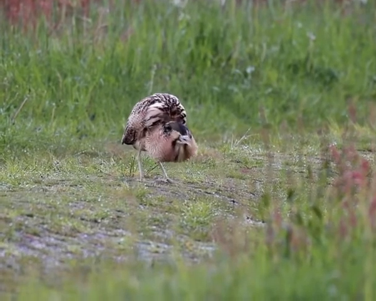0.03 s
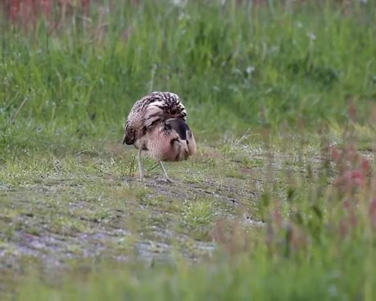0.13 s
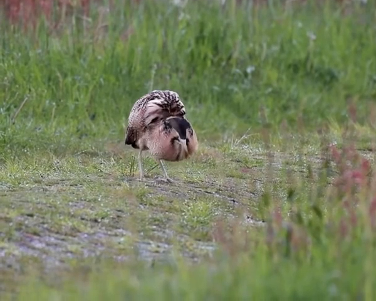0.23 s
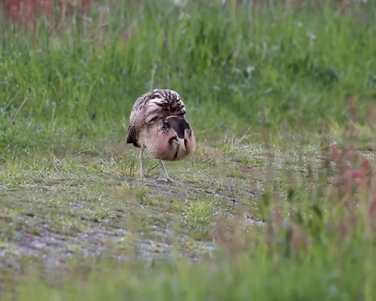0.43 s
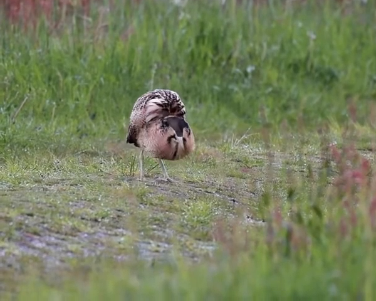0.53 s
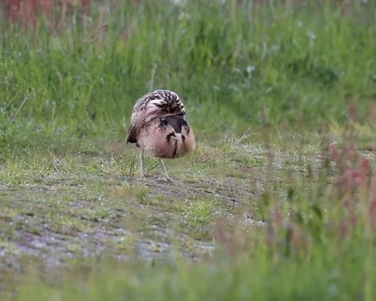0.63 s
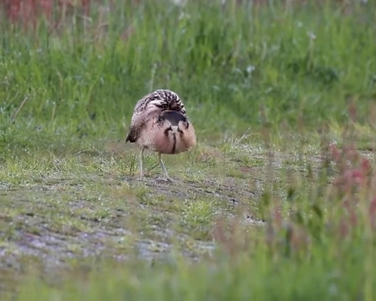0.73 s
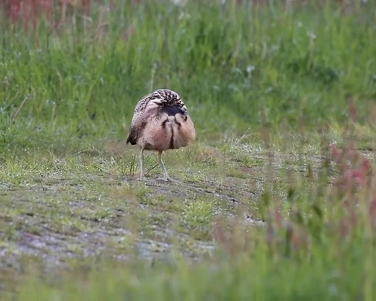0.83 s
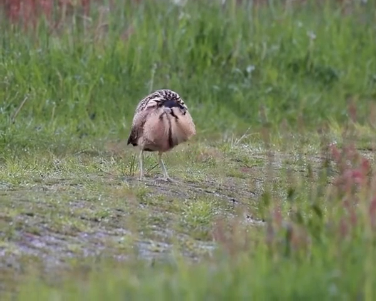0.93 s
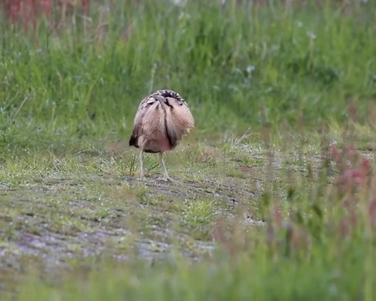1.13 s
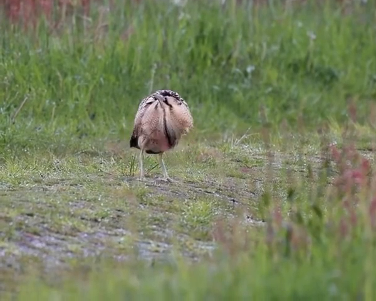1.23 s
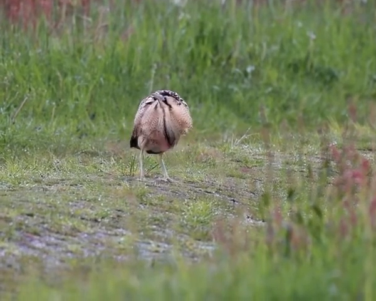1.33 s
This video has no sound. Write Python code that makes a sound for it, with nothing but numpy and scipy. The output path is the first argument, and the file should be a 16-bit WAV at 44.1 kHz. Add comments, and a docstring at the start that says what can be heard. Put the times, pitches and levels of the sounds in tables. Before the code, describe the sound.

A large bird booms once in open grassland. A soft low note at 0-0.1 s leads to a deep, almost pure tone near 150 Hz from 0.2 s, swelling in quick throbs, holding until 0.6 s and fading by 0.8 s. Faint chirps run throughout, a small nasal call comes near 0.3 s, and thin gliding whistles from 0.6 to 1.3 s. Birds sit far right over soft rumble, hiss and tiny early grass ticks.

```python
"""Booming bird in open grassland

A large bird booms once: a soft low note, then a nearly pure tone from its inflated throat that swells
in three throbs, holds and dies away. Small birds whistle and chirp in gliding sines; nasal calls are
three harmonics through throat resonances. Decaying noise bursts tick in the grass; shaped noise gives
a faint rumble of air and a steady hiss. The birds are much louder on the right."""
import sys
import numpy as np
from scipy import signal
from scipy.fft import rfft, irfft
from scipy.io import wavfile
from scipy.ndimage import uniform_filter1d

SR = 44100
rng = np.random.default_rng(int(sys.argv[2]) if len(sys.argv) > 2 else 0)


def unload_audio(sound):
    """Save the sound as a 16-bit wav file, at the path given as the first command line argument."""
    columns = np.transpose(np.atleast_2d(sound))
    # keep every value between -1 and 1, then stretch to whole-number steps
    steps = np.round(np.clip(columns, -1, 1) * 32767)
    wavfile.write(sys.argv[1], SR, steps.astype(np.int16))


N = 61739  # samples


def undb(db):
    """Decibels to gain."""
    return 10 ** (np.asarray(db) / 20)


def walk(rate_hz):
    """Smooth random motion with a spread of 1: white noise averaged twice."""
    size = max(2, int(SR / rate_hz))
    noise = rng.standard_normal(N)
    smooth = uniform_filter1d(uniform_filter1d(noise, size), size)
    return smooth / smooth.std()


def pan(x, right_over_left_db):
    """The right channel at full level, the left weaker."""
    return x * np.array([[undb(-right_over_left_db)], [1]])


def tone(hz):
    """A sine of rms 1 that follows a pitch: phase is the running sum of frequency."""
    return np.sqrt(2) * np.sin(2 * np.pi * np.cumsum(hz) / SR)


def follow(curve, size):
    """Pitch and gain along a curve, silent outside it, corners rounded over size samples."""
    t = np.arange(N) / SR
    time_s, pitch_hz, level_db = np.array(curve).T
    hz = np.interp(t, time_s, pitch_hz)
    inside = (t >= time_s[0]) * (t <= time_s[-1])
    gain = undb(np.interp(t, time_s, level_db)) * inside
    return uniform_filter1d(hz, size), uniform_filter1d(gain, size)


def note(start_s, length_s):
    """Progress 0-1 through a short note, and its arched envelope."""
    progress = np.clip((np.arange(N) / SR - start_s) / length_s, 0, 1)
    return progress, np.sin(np.pi * progress)


def field(x, wet_db):
    """Diffuse scatter from grass and banks: exponentially decaying noise tails of unit energy."""
    t60_s, pan_db = 0.22, 18
    t = np.arange(N // 2) / SR
    tail = rng.standard_normal((2, len(t))) * np.exp(-np.log(1000) * t / t60_s)
    tail /= np.sqrt(np.sum(tail ** 2, axis=1, keepdims=True))
    wet = signal.fftconvolve(x[None], tail, axes=1)[:, :N]
    return pan(undb(wet_db) * wet, pan_db)


def booming_bird():
    """The inflated throat rings as one nearly pure tone: a soft note, then the boom."""
    # boom: (time [s], pitch [Hz], level [dB])
    boom_curve = [(.192, 140.2, -43.5), (.201, 136.6, -20.5), (.212, 130.3, -17.5), (.231, 118.1, -21),
                  (.249, 146.6, -9), (.261, 134.5, -16.5), (.273, 149.5, -7.5), (.286, 160.8, -6.5),
                  (.298, 158.4, -9), (.345, 152.5, -5), (.38, 152, -5), (.445, 152.2, -6.5),
                  (.48, 150.3, -5.5), (.56, 151.8, -6.5), (.622, 148.8, -8), (.668, 154, -17.5),
                  (.70, 149, -25.5), (.76, 153.6, -38.5), (.84, 150, -66)]
    # soft note before it: (time [s], pitch [Hz], level [dB])
    lead_curve = [(0, 195, -28), (.05, 195.5, -29.5), (.066, 183, -34.5), (.078, 179, -31.5),
                  (.098, 179, -33.5), (.115, 174.6, -57)]
    octave_db, flutter_db = -62, 0.41  # octave re fundamental
    boom_pan_db, lead_pan_db, field_db = 17.5, 16, -42

    hz, gain = follow(boom_curve, size=220)
    partials = tone(hz) + undb(octave_db) * tone(2 * hz)
    boom = gain * undb(flutter_db * walk(75)) * partials
    hz, gain = follow(lead_curve, size=220)
    lead = gain * tone(hz)
    return pan(boom, boom_pan_db) + pan(lead, lead_pan_db) + field(boom + lead, field_db)


def whistles():
    """Thin gliding sines, slightly unsteady in pitch and level."""
    # one curve per whistle: (time [s], pitch [Hz], level [dB])
    whistle_curves = [
        [(.605, 6250, -73.5), (.618, 6050, -45), (.632, 5750, -38), (.662, 5820, -44), (.671, 5530, -34),
         (.68, 5280, -51), (.691, 5520, -31.5), (.70, 6250, -51.5), (.71, 6870, -44)],
        [(.792, 6350, -50), (.805, 6460, -32.5), (.818, 6200, -43), (.826, 5910, -32.5), (.843, 5795, -38),
         (.851, 6170, -36.5), (.859, 6870, -48), (.882, 6800, -55)],
        [(.962, 6150, -69), (.971, 5970, -30), (.982, 5955, -39), (.992, 5470, -24.5), (1.002, 5310, -40.5),
         (1.02, 5050, -37.5), (1.045, 5000, -43.5), (1.056, 4900, -53)],
        [(1.12, 4710, -56), (1.136, 4740, -38.5), (1.148, 4790, -29.5), (1.178, 5130, -27), (1.2, 5280, -30.5),
         (1.234, 5447, -28), (1.252, 5520, -40.5), (1.271, 5530, -57), (1.278, 5500, -65)],
    ]
    flutter_db, jitter_ratio = 1.2, 0.0012
    out = np.zeros(N)
    for curve in whistle_curves:
        hz, gain = follow(curve, size=130)
        level = gain * undb(flutter_db * walk(250))
        out += level * tone(hz * (1 + jitter_ratio * walk(560)))
    return out


def chirp(start_s, length_s, start_hz, middle_hz, end_hz, db):
    """One quick sine note whose pitch bends through three points."""
    progress, swell = note(start_s, length_s)
    bow_hz = middle_hz - (start_hz + end_hz) / 2
    hz = start_hz + (end_hz - start_hz) * progress + bow_hz * swell
    return undb(db) * swell * tone(hz)


def twitter():
    """Distant birds: faint, straight-gliding chirps at random times and pitches."""
    draws_per_s, length_s, level_db = 45, 0.016, -60.5
    base_hz, spread_hz, sweep_hz = 5340, 1300, 350
    duration_s = N / SR
    out = np.zeros(N)
    # draws run -1.3 to 1; notes that end before time 0 are silent
    for when, height, sweep, size in rng.uniform(-1.3, 1, (int(draws_per_s * duration_s), 4)):
        start_s = (when + 1) / 2 * duration_s
        hz, glide_hz = base_hz + spread_hz * height, sweep_hz * sweep
        out += chirp(start_s, length_s, hz - glide_hz, hz, hz + glide_hz, level_db + 3 * size)
    return out


def chirps():
    """Short chirps of nearer birds over the twitter, under a common level flutter."""
    # (start [s], length [s], start pitch [Hz], middle pitch [Hz], end pitch [Hz], level [dB])
    chirp_notes = [(.015, 0.085, 4470, 4570, 4560, -52.5), (0.064, 0.12, 5680, 5650, 5540, -54.5),
                   (0.145, 0.039, 6000, 5875, 5910, -38.5), (0.199, 0.012, 7040, 6790, 6000, -50),
                   (0.245, 0.027, 4900, 5150, 5200, -51.5), (.308, .028, 7050, 6650, 5900, -50),
                   (.353, 0.02, 3726, 4374, 5010, -53), (.429, 0.034, 7180, 6570, 5970, -47),
                   (0.538, .02, 4246, 4715, 4920, -50.5), (0.555, .022, 7000, 6420, 5580, -46.5),
                   (.654, .011, 6110, 6386, 6870, -50.5), (0.717, 0.042, 4910, 5020, 4940, -47.5),
                   (.837, 0.021, 3730, 4320, 4800, -54), (1.018, 0.011, 4180, 4680, 4900, -45),
                   (1.186, 0.034, 4180, 3690, 3360, -51.5), (1.321, 0.02, 5050, 5130, 5000, -52.5),
                   (1.333, 0.034, 4050, 3384, 4120, -41.5)]
    flutter_db = 3.5
    near = sum(chirp(*row) for row in chirp_notes)
    return (near + twitter()) * undb(flutter_db * walk(300))


def nasal_calls():
    """Rough arched calls whose three harmonics pass through fixed throat resonances."""
    # (start [s], length [s], top pitch [Hz], level [dB])
    calls = [(0.271, .049, 1021, -35), (0.817, 0.0426, 1034, -49)]
    # throat resonance of each harmonic: (centre [Hz], width [Hz], relative level [dB])
    throat = [(1020, 270, -23.5), (1930, 640, -0.5), (3254, 170, -5)]
    arch_ratio, top_progress = 0.34, 0.36  # pitch drop, place of the pitch peak
    jitter_ratio, flutter_db = 0.014, 3
    out = np.zeros(N)
    for start_s, length_s, pitch_hz, db in calls:
        progress, swell = note(start_s, length_s)
        arch = 1 - arch_ratio * (progress - top_progress) ** 2
        hz = pitch_hz * (arch + jitter_ratio * walk(500))
        for k, (centre_hz, width_hz, part_db) in enumerate(throat, 1):
            resonance = 1 / np.hypot(1, 2 * (k * hz - centre_hz) / width_hz)
            level = undb(db + part_db + flutter_db * walk(230))
            out += level * swell * resonance * tone(k * hz)
    return out


def small_birds():
    """Whistles, chirps and nasal calls on the right, with their scatter."""
    whistle_pan_db, chirp_pan_db, field_db = 28.5, 25.5, -13.5
    whistled = whistles()
    chirped = nasal_calls() + chirps()
    direct = pan(whistled, whistle_pan_db) + pan(chirped, chirp_pan_db)
    return direct + field(whistled + chirped, field_db)


def ticks():
    """Faint dry ticks in the grass: bursts of midrange noise with a fast exponential decay."""
    # (time [s], level [dB])
    tick_levels = [(.016, -44), (.056, -54), (.16, -50.5), (.579, -54)]
    decay_s, band_hz, pan_db = 0.0054, [600, 1900], 10.5
    t = np.arange(N) / SR
    bursts = sum(undb(db) * (t >= s) * np.exp(-np.abs(t - s) / decay_s) for s, db in tick_levels)
    band = signal.butter(2, band_hz, "band", fs=SR, output="sos")
    noise = signal.sosfilt(band, rng.standard_normal(N))
    return pan(bursts * noise / noise.std(), pan_db)


def air():
    """A gently swelling rumble under smooth hiss: shaped noise, unrelated left and right."""
    # spectrum of rumble and hiss: (frequency [Hz], relative density [dB])
    air_spectrum = [(15, -13.5), (30, -9), (56, 3), (90, -2), (160, -5.5), (260, -10.5), (400, -15.5),
                    (700, -21.5), (1100, -24), (2100, -28.5), (3300, -28.5), (5200, -25.5), (7000, -28.5),
                    (9500, -30.5), (15500, -33)]
    # right over left: (frequency [Hz], level difference [dB])
    air_lean = [(30, 4.5), (150, 0.5), (700, 2), (2000, 2), (5000, 4), (9000, 0.4)]
    # narrow dips in the hiss: (centre [Hz], half width [Hz], depth [dB])
    hiss_dips = [(2606, 190, 19), (7730, 420, 22)]
    level_db, rumble_hz, swell_db = -44.5, 300, 0.5
    f = np.maximum(np.arange(N // 2 + 1) * SR / N, 1)

    def along(points):
        """Levels interpolated over log frequency."""
        hz, db = np.array(points).T
        return np.interp(np.log(f), np.log(hz), db)

    dips_db = sum(depth * np.exp(-((f - hz) / width) ** 2) for hz, width, depth in hiss_dips)
    lean_db = np.array([[-0.5], [0.5]]) * along(air_lean)
    shape = undb(along(air_spectrum) - dips_db + lean_db)
    spectrum = rfft(rng.standard_normal((2, N))) * shape
    low = 1 / (1 + (f / rumble_hz) ** 2)
    rumble = irfft(spectrum * low, N) * undb(swell_db * walk(3))
    hiss = irfft(spectrum * (1 - low), N)
    out = rumble + hiss
    return undb(level_db) * out / out.std()


def scene():
    """The boom, the small birds, the ticks and the open air."""
    return booming_bird() + small_birds() + ticks() + air()


def record(dry):
    """The recorder cuts the top: a steep elliptic low-pass."""
    top_hz = 15700
    low_pass = signal.ellip(10, 0.1, 80, top_hz, fs=SR, output="sos")
    return signal.sosfilt(low_pass, dry)


dry = scene()
out = record(dry)
unload_audio(out)
```